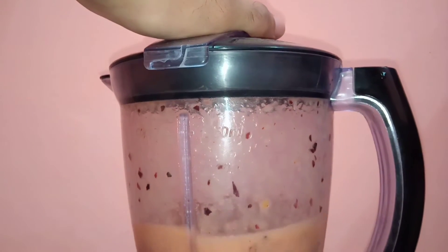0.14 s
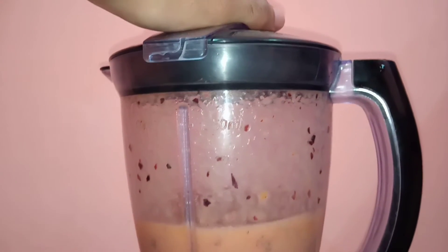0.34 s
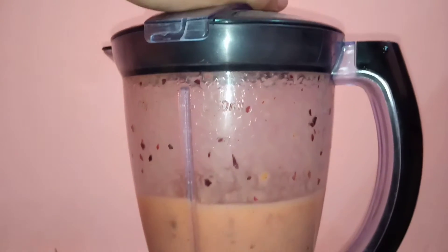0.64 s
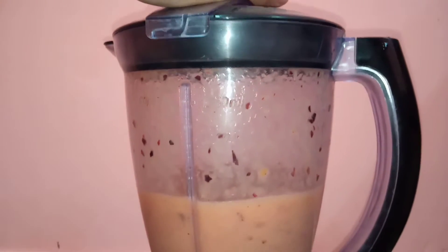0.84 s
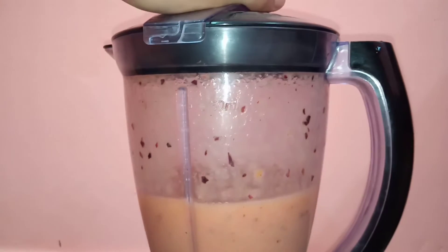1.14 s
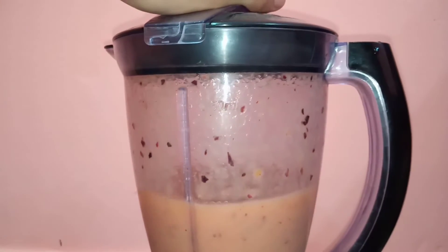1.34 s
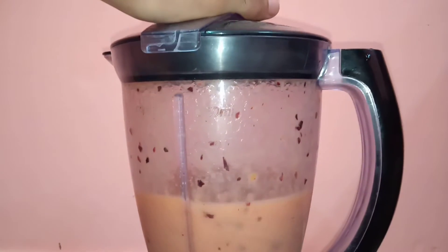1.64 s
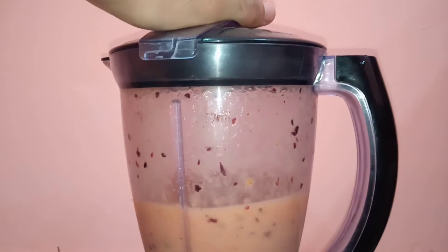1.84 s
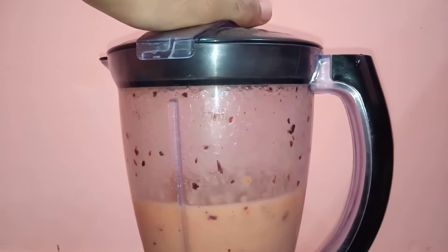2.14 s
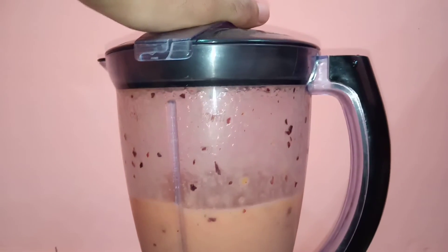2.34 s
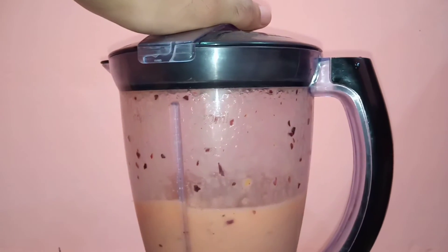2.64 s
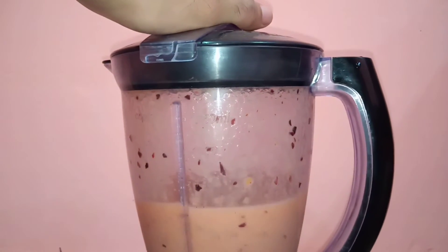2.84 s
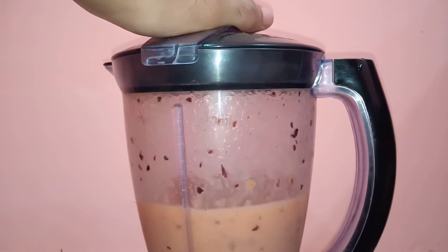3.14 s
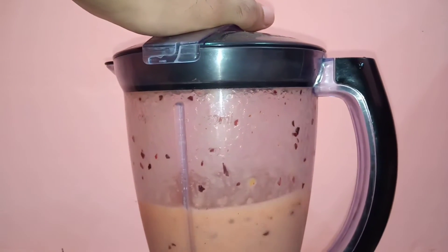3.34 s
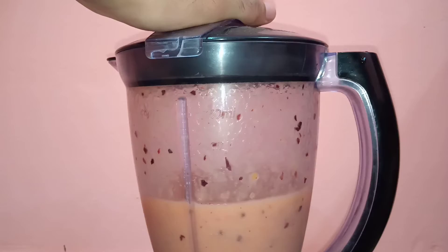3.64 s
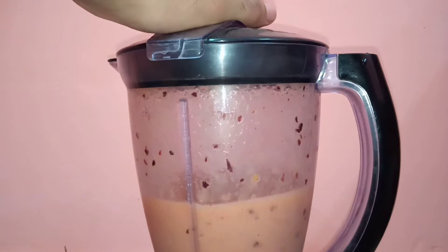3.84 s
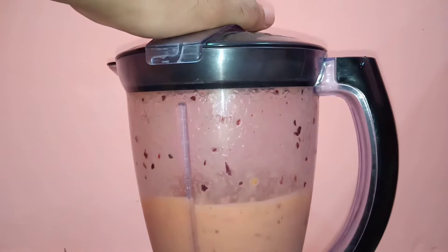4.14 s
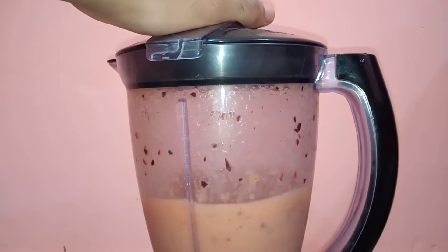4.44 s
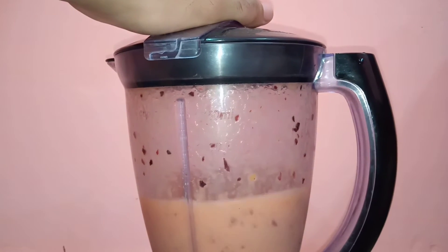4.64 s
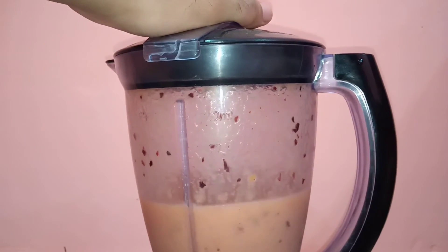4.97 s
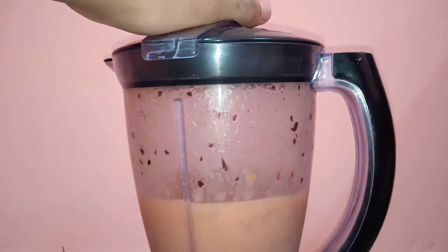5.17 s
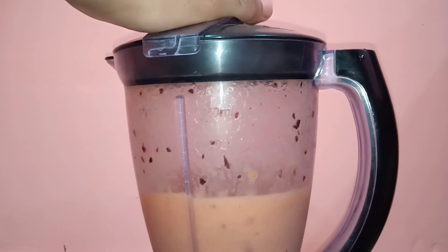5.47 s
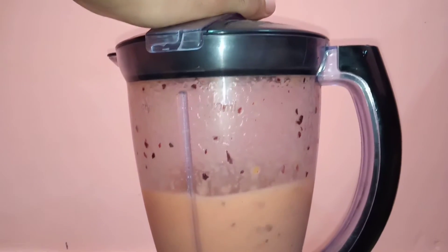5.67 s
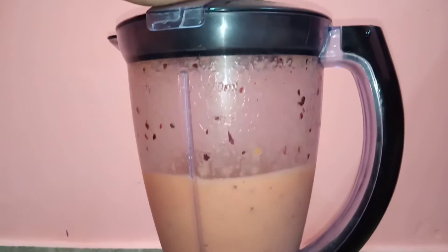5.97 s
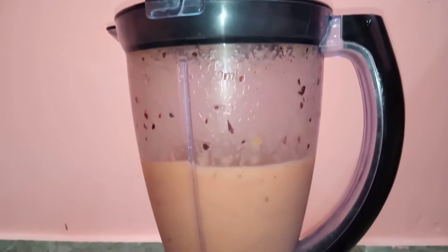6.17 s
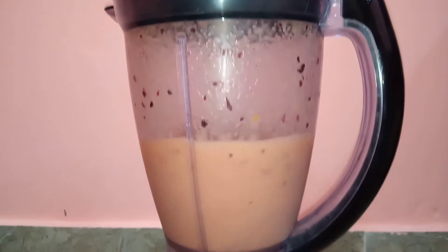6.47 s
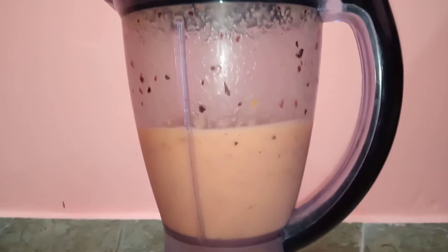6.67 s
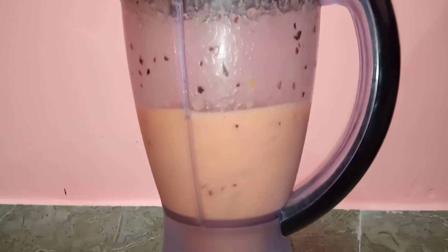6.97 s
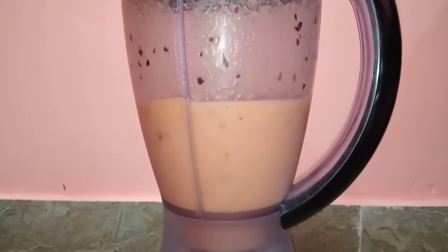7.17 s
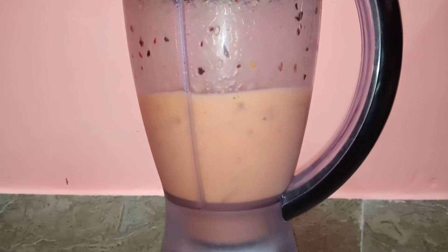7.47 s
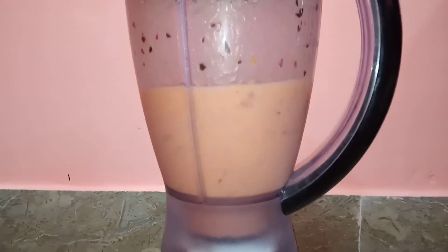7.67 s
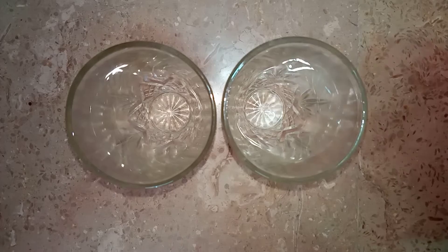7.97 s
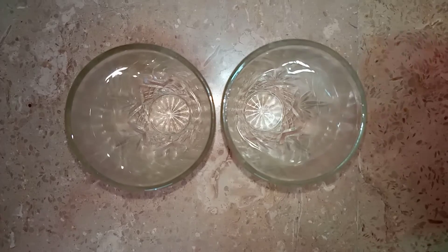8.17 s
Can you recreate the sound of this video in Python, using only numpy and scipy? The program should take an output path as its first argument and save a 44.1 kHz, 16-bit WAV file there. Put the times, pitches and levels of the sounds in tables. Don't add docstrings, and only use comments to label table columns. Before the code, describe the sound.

Close to a phone microphone in a kitchen, an electric jug blender is already running at full speed: low shaft hum, rough blade roar, thin high whine and wet churning hiss. Ice chips crack and rattle irregularly on the jug wall. Near the end it cuts off abruptly, leaves a short silence, then a very quiet room hum fades in with a clear small tick.

```python
import sys
import numpy as np
from scipy import signal
from scipy.fft import rfft, irfft, next_fast_len
from scipy.io import wavfile
from scipy.ndimage import uniform_filter1d, map_coordinates

SR = 44100
rng = np.random.default_rng(int(sys.argv[2]) if len(sys.argv) > 2 else 0)


def magnitude_from_level(level_db):
    exponent = np.asarray(level_db, float) / 20
    return 10 ** exponent


def transcribe(signal):
    frames = np.atleast_2d(signal).T
    limited = np.clip(frames, -1, 1)
    pcm = np.round(limited * 32767).astype(np.int16)
    wavfile.write(sys.argv[1], SR, pcm)


N = 366471
TIME = np.arange(N) / SR

CUT_S, RETURN_S = 7.6535, 7.823
BARS = 24
MAINS_HZ = 50
USUAL_WHINE_HZ = 4495

# start_s, whine_hz
MOTOR_SPEED = [(0.1, 4472), (0.5, 4500), (0.8, 4488), (1.3, 4514), (1.62, 4469), (2.18, 4526), (2.95, 4486),
               (3.2, 4490), (3.6, 4472), (3.7, 4460), (4.12, 4452), (4.5, 4500), (4.98, 4530), (5.4, 4486),
               (5.88, 4498), (6.35, 4472), (7.25, 4481), (7.66, 4435)]
# start_s, whine_db, unbalance_db
JUG_SEAT = [(0.3, -33, -50.5), (.95, -38, -50), (1.25, -44, -47), (1.5, -36.5, -46.5), (1.74, -37, -48.5),
            (1.86, -43, -47.5), (2.4, -45, -45.5), (3.1, -46, -51.5), (3.56, -44, -52),
            (3.68, -36.5, -50.5), (4.25, -36.5, -43.5), (4.4, -47.5, -45), (5.2, -46, -42.5),
            (5.6, -46, -51.5), (5.9, -39.5, -48.5), (6.6, -48, -47), (7.0, -41.5, -50), (7.5, -39.5, -48.5)]
# multiple_of_shaft_speed, level_db
SHAFT_NOTES = [(2, -56), (3, -45), (4, -46), (6, -53), (7, -50), (9, -54), (10, -51), (12, -60), (20, -57),
               (23, -58), (28, -63), (32, -64), (35, -61), (36, -51), (41, -59), (45, -62), (51, -70),
               (53, -63), (56, -74), (60, -72), (68, -70), (77, -71), (80, -72)]
# multiple_of_shaft_speed, level_db
BLADE_ROAR = [(3, -44.5), (4, -45), (5, -35.5), (6, -35.5), (7, -33.5), (8, -42.5), (9, -43), (10, -33.5)]
# pitch_hz, level_db (per Hz)
JUG_COLOUR = [(18, -42.5), (48, -28.5), (85, -30.5), (110, -18.5), (240, -15), (500, -10.5), (600, -10),
              (900, -6.5), (1500, -4), (1650, -0.5), (1800, -5), (2300, -11.5), (3000, -30.5)]
# pitch_hz, level_db (per Hz)
CHURN_COLOUR = [(1290, -19.5), (2200, -1.5), (3040, -2), (3870, -2), (4200, -6), (4640, -7.5),
                (5050, -10.5), (7270, -3.5), (9410, -21), (13700, -20.5), (15000, -18), (16000, -20)]
# start_s, peak_db, ring_db (near 7 kHz), knock_db (near 3 kHz)
ICE_CHIPS = [(0.3905, -27, -2, -3), (0.5664, -38.5, 4.5, 11), (0.8011, -27.5, 1.5, 0),
             (0.9717, -27, -6, 1.5), (1.2574, -30.5, 5, -0.5), (1.3054, -34.5, 7.5, 5.5),
             (1.6414, -31.5, 4, 5), (1.709, -30, 4, 11), (1.714, -28, 2, 0), (1.8786, -27.5, 6.5, 7),
             (2.1542, -23.5, 5, -9.5), (2.3884, -33.5, 6.5, 15.5), (2.6554, -33.5, -1, 9.5),
             (2.8444, -28, -15, -10.5), (2.855, -30, 1, 8.5), (2.9881, -28.5, 6.5, -6),
             (3.5454, -31, 3.5, 8.5), (3.6371, -28.5, 1, 5), (4.1444, -33, 5.5, 10), (4.4243, -28, -1.5, 1),
             (4.6034, -29, 10.5, 5), (5.019, -30.5, 8, 4.5), (5.4181, -33, 10.5, 0.5),
             (5.7548, -29.5, -1, -7.5), (6.096, -23, 4, -2), (6.786, -32.5, 14.5, 6.5),
             (7.199, -27.5, 1, 1.5), (7.3704, -33, 7, -1.5), (7.3851, -26, 0, -2.5)]
# pitch_hz, width_hz, level_db
BODY_RESONANCES = [(311, 21, 6), (366, 26, -5.5), (469, 25, 4), (519, 56, -5.5), (710, 14, -1),
                   (835, 29, 0.5), (1044, 32, 5.5), (1069, 30, -10), (1170, 72, 3), (1306, 37, -2.5),
                   (1460, 61, -4.5), (1558, 30, -5.5), (1756, 46, -2), (2060, 40, 0), (2050, 46, 2),
                   (3420, 260, 2), (6120, 220, 3), (7190, 300, 0.5), (10600, 700, -2.5), (11600, 700, 2.5),
                   (12400, 300, -1)]
# pitch_hz, level_db (per Hz)
AIR_COLOUR = [(300, -30), (500, -4), (1200, -5), (1700, -12), (2100, -12), (2900, -21), (3700, -21),
              (4200, -27), (5900, -31), (7300, -22), (8900, -34), (13300, -36), (16000, -46)]
# pitch_hz, level_db (per Hz)
DEEP_HUM_COLOUR = [(30, -25), (60, -15), (120, -17), (160, -4), (400, -10), (600, -22)]
# pitch_hz, width_hz, level_db
ROOM_DRONES = [(154.4, 17, -66), (204, 27, -61), (250, 40, -57), (316, 33, -55), (377, 18, -49.5)]
# start_s, peak_db
KITCHEN_TICKS = [
    (7.975, -52),
    (8.112, -35),
    (8.135, -52),
]
# start_s, low_hz, high_hz
STEREO_SLIPS = [(1.135, 13800, 15700), (1.787, 11800, 13300), (2.113, 4600, 6500), (2.113, 10400, 12600),
                (3.39, 11800, 13300), (4.247, 4600, 5800), (4.247, 14600, 15700), (4.807, 5700, 7200),
                (4.807, 9700, 11200), (5.205, 13200, 14600), (5.622, 4200, 5400), (5.622, 13800, 15400),
                (6.133, 13200, 14600), (6.85, 4200, 5400), (6.85, 6900, 8500), (7.152, 9700, 11200),
                (7.525, 5700, 8500)]


def unit(x):
    return x / np.sqrt(np.mean(np.abs(x) ** 2) + 1e-20)


def curves(rows):
    s, *columns = np.transpose(rows)
    return [np.interp(TIME, s, column) for column in columns]


def wobble(rate):
    coarse = TIME[::32]
    knots = rng.standard_normal(int(N * rate / SR) + 4)
    return np.interp(TIME, coarse, map_coordinates(knots, [coarse * rate]))


def filtered(x, response):
    size = next_fast_len(N + 8192)
    return irfft(rfft(x, size) * response(np.fft.rfftfreq(size, 1 / SR)), size)[..., :N]


def colour(points):
    points_hz, db = np.transpose(points)
    return lambda hz: magnitude_from_level(np.interp(np.log(hz + 1), np.log(points_hz + 1), db, left=-120, right=-120))


def random_field(shape, size):
    field = uniform_filter1d(rng.standard_normal(shape), size[0], 0)
    return unit(uniform_filter1d(field, size[1], 1))


def rush(points, patchy_db, streaky_db=1.0):
    z = signal.stft(rng.standard_normal(N), nperseg=512)[2]
    patches = patchy_db * random_field(z.shape, (8, 8))
    streaks = streaky_db * random_field(z.shape, (2, 90))
    noise = signal.istft(z * magnitude_from_level(patches + streaks), nperseg=512)[1][:N]
    return unit(filtered(noise, colour(points)))


def flutter(width_hz):
    noise = filtered(rng.standard_normal((2, N)), lambda hz: 1 / (1 + (hz / width_hz) ** 2))
    return unit(np.array([1, 1j]) @ noise)


def bursts(seconds, levels_db, t60, attack=0.0008):
    starts = np.bincount(np.round(seconds * SR).astype(int), magnitude_from_level(levels_db), N)[:N]
    t = TIME[:SR // 8]
    shape = magnitude_from_level(-60 * t / t60) * (1 - np.exp(-t / attack))
    return signal.fftconvolve(starts, shape)[:N] * rng.standard_normal(N)


def seating(whine_hz):
    whine_db, first_db = curves(JUG_SEAT)
    rock_db = first_db - first_db.mean()
    fifth_db = -37 - 0.85 * rock_db - 0.4 * np.maximum(whine_hz - USUAL_WHINE_HZ, 0)
    lowered = np.clip((TIME - 6.2) / 0.3, 0, 1)
    overtone_db = -61.5 - 0.35 * (whine_db - whine_db.mean()) + 8.5 * lowered
    fifth_db = fifth_db + 1.2 * wobble(4)
    return first_db, fifth_db, whine_db + 0.6 * wobble(8), overtone_db + 2.5 * wobble(4)


def motor(turn, first_db, fifth_db, whine_db, overtone_db):
    def tone(multiple, db):
        phase = multiple * turn + rng.uniform(0, 2 * np.pi)
        return np.sqrt(2) * magnitude_from_level(db) * np.exp(1j * phase)

    notes = sum(tone(k, db + 1.7 * wobble(3.02) + 1.1 * wobble(25)).real for k, db in SHAFT_NOTES)
    notes += tone(1, first_db + 1.5 * wobble(12)).real
    notes += tone(5, fifth_db + 1.5 * wobble(20)).real

    whine = tone(BARS, whine_db + 0.8 * wobble(14) + 2.2 * wobble(40))
    whine += tone(2 * BARS, overtone_db + 2 * wobble(30))
    whine += tone(3 * BARS, overtone_db - 7 + 2 * wobble(30))
    pull = np.exp(-2j * np.pi * 2 * MAINS_HZ * TIME)
    whine = whine * (1 + 0.12 * pull) + tone(1.5 * BARS, -56) * pull

    hum = magnitude_from_level(-53) * np.sin(2 * np.pi * 2 * MAINS_HZ * TIME)
    hum += magnitude_from_level(-69) * np.sin(2 * np.pi * MAINS_HZ * TIME)
    return notes + whine.real + hum * magnitude_from_level(1.2 * wobble(6.7))


def wake(turn):
    swirl_hz, width_hz, shared = 27, 22, 0.37
    swirl = np.exp(2j * np.pi * swirl_hz * TIME)
    common = flutter(width_hz)
    total = np.zeros(N)
    for k, db in BLADE_ROAR:
        rough = np.sqrt(shared) * common + np.sqrt(1 - shared) * flutter(width_hz * k / 6.4)
        level = np.sqrt(2) * magnitude_from_level(db + 1.1 * wobble(3.11) + 1.0 * wobble(9))
        total += level * (rough * swirl * np.exp(1j * k * turn)).real
    return total


def chips():
    s, db, ring_db, knock_db = np.transpose(ICE_CHIPS)
    bright = colour([(7500, -27), (9500, -2), (14000, -0.5), (16000, 4)])
    ringing = colour([(3500, -12.5), (5400, -0.5), (6400, -2.5), (7200, 5.5), (10000, -21)])
    dull = colour([(600, -16), (1500, -1.5), (3200, -1), (3850, -0.5), (4500, -7), (6000, -23)])
    crack = filtered(bursts(s, db, 0.041), bright)
    ring = filtered(bursts(s, db + ring_db + 9.5, 0.029), ringing)
    knock = filtered(bursts(s, db + knock_db + 12, 0.04), dull)

    rattle_at, rattle_size, spit_at, spit_size = rng.random((4, 500))
    rattle = bursts(rattle_at * CUT_S, 14 * rattle_size ** 2 - 27, 0.012)
    spit = bursts(spit_at * CUT_S, 16 * spit_size ** 3 - 44, 0.018)
    return crack + ring + knock + filtered(rattle, colour(CHURN_COLOUR)) + filtered(spit, bright)


def shell(hz):
    return magnitude_from_level(sum(db / (1 + (2 * (hz - c) / w) ** 2) for c, w, db in BODY_RESONANCES))


def blender():
    whine_hz, = curves(MOTOR_SPEED)
    unsteady = 1 + 0.0011 * wobble(14) + 0.0009 * wobble(8)
    turn = 2 * np.pi * np.cumsum(whine_hz * unsteady / BARS) / SR

    roar_db = -24 - 0.0056 * (whine_hz - USUAL_WHINE_HZ)
    surge = 0.55 * wobble(6) + 0.32 * wobble(25)
    beat = 1 + 0.03 * np.cos(turn) + 0.025 * np.cos(2 * turn)
    roar = magnitude_from_level(roar_db - 1.5 + 1.5 * surge) * rush(JUG_COLOUR, patchy_db=0.47, streaky_db=0.85)
    hiss_level = magnitude_from_level(-29.2 + surge + 0.7 * wobble(80)) * beat
    hiss = hiss_level * rush(CHURN_COLOUR, patchy_db=0.73, streaky_db=1.4)
    whirl = magnitude_from_level(roar_db + 24 + 0.42 * surge) * wake(turn)
    return motor(turn, *seating(whine_hz)) + whirl + filtered(roar + hiss + chips(), shell)


def kitchen():
    fade = np.clip((TIME - RETURN_S + 0.023) / 0.31, 0, 1)
    air = magnitude_from_level(2.5) * rush(AIR_COLOUR, patchy_db=1.0)
    air += magnitude_from_level(1.0) * rush(DEEP_HUM_COLOUR, patchy_db=1.5)
    drones = sum(magnitude_from_level(db + 47) * (flutter(width / 2) * np.exp(2j * np.pi * hz * TIME)).real
                 for hz, width, db in ROOM_DRONES)
    fan_hz, fan_beat_hz, fan_peak_s = 152.4, 1.9, 8.27
    fan_beat = np.cos(2 * np.pi * fan_beat_hz * (TIME - fan_peak_s))
    fan = magnitude_from_level(3) * fan_beat * np.sin(2 * np.pi * fan_hz * TIME)

    s, db = np.transpose(KITCHEN_TICKS)
    tick_colour = colour([(2500, -12), (4500, 0), (5800, -8), (7500, 2), (10000, -12)])
    ticks = filtered(bursts(s, db, 0.02), tick_colour)
    return magnitude_from_level(-47.5) * fade * (air + drones + fan) + ticks


def scene():
    edge = np.where(TIME < CUT_S, 1, magnitude_from_level(-20 - 60 * (TIME - CUT_S) / 0.008))
    rise = np.clip((TIME - RETURN_S) / 0.004, 0, 1)
    return np.tile(edge * blender() + rise * kitchen(), (2, 1))


def low_pass(x):
    return signal.sosfilt(signal.butter(12, 17080, fs=SR, output="sos"), x)


def record(dry):
    side, size = np.zeros(N), 1600
    hz = np.fft.rfftfreq(size, 1 / SR)
    for s, low_hz, high_hz in STEREO_SLIPS:
        start = round(s * SR) - size // 2
        earlier = rfft(dry[0, start - 4 * size:start - 3 * size])
        band = irfft(earlier * ((hz > low_hz) & (hz < high_hz)), size)
        side[start:start + size] += np.sqrt(np.hanning(size)) * band
    top_hz = 15730
    mix = filtered(dry, lambda hz: np.clip((top_hz + 40 - hz) / 80, 0, 1))
    mix = mix + magnitude_from_level(-2.5) * np.outer([1, -1], side)
    return low_pass(mix)


dry = scene()
out = record(dry)
transcribe(out)
```